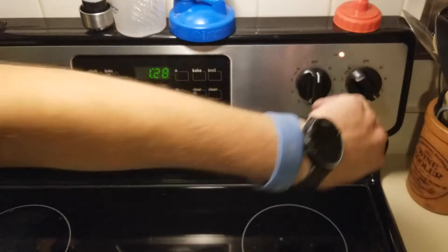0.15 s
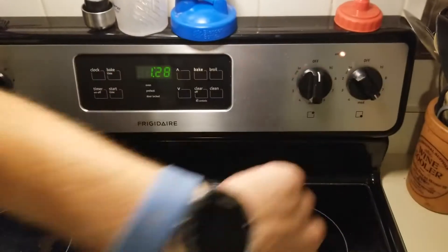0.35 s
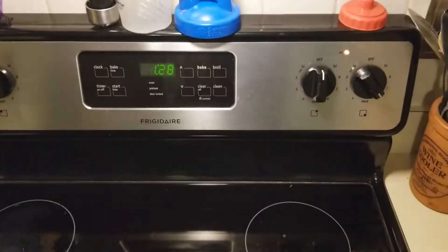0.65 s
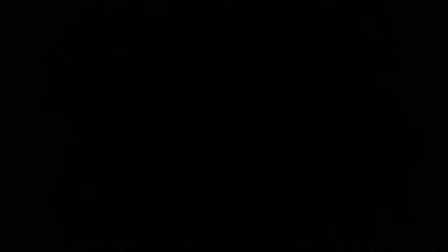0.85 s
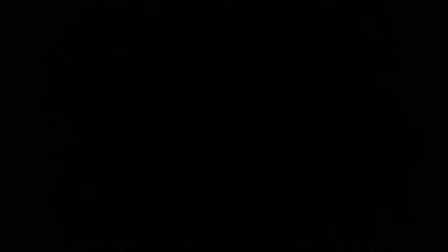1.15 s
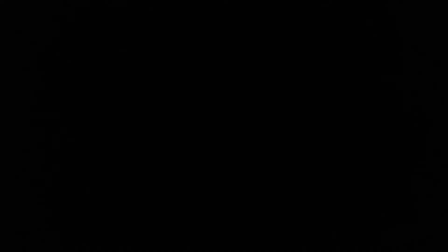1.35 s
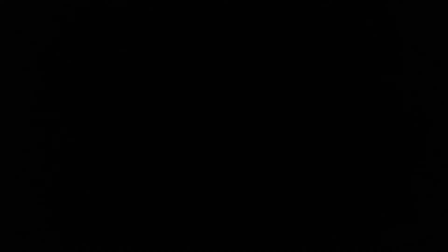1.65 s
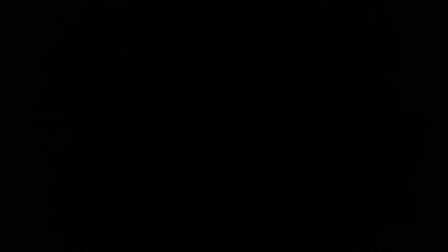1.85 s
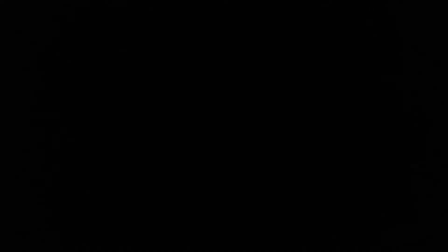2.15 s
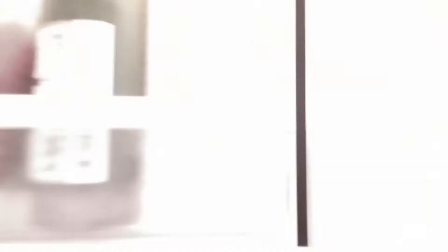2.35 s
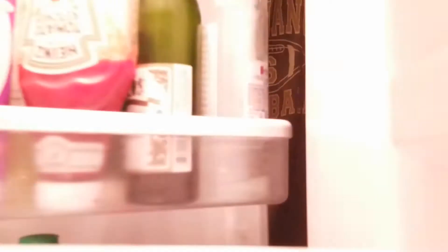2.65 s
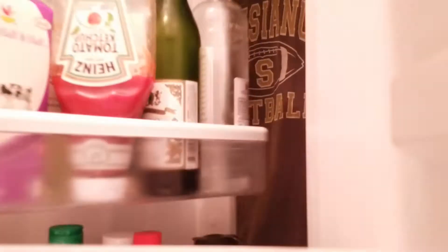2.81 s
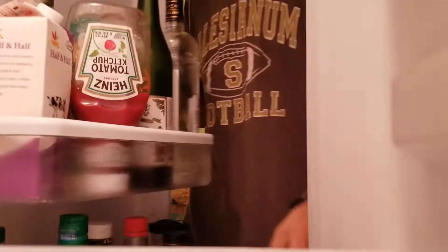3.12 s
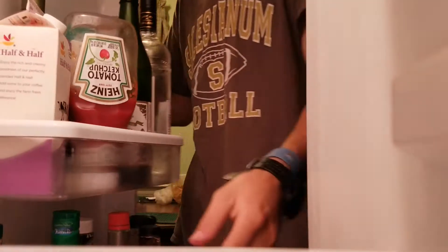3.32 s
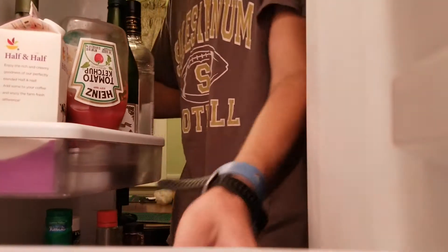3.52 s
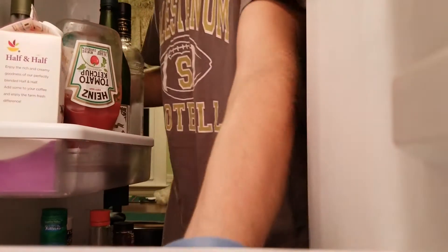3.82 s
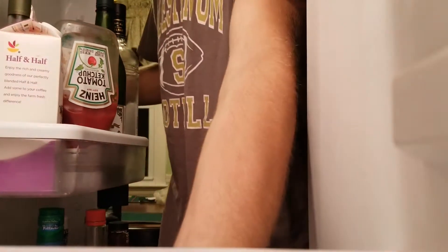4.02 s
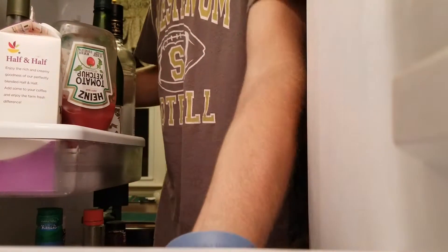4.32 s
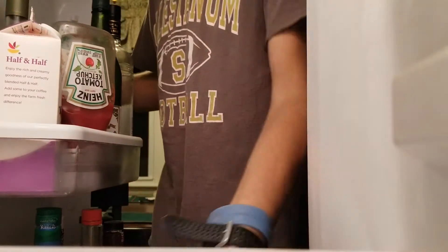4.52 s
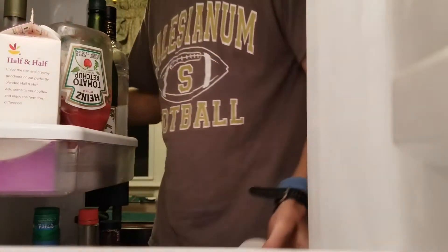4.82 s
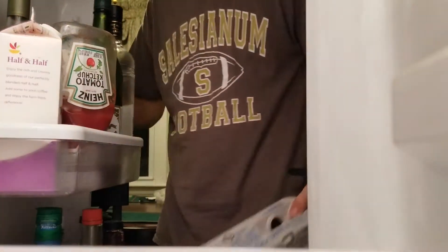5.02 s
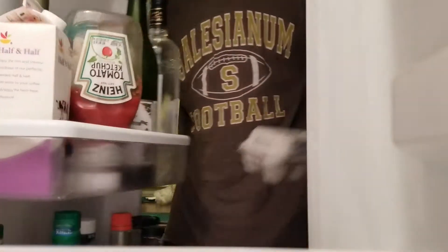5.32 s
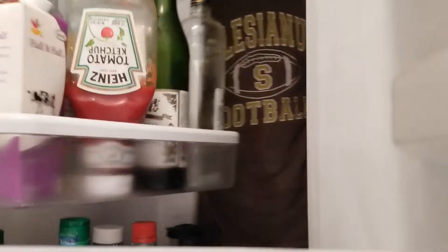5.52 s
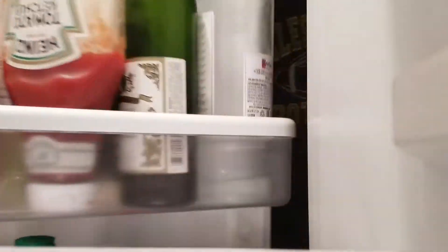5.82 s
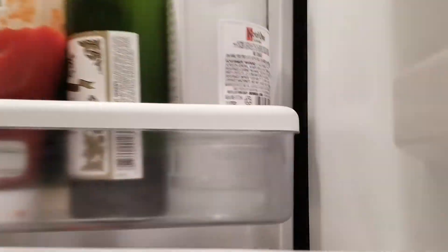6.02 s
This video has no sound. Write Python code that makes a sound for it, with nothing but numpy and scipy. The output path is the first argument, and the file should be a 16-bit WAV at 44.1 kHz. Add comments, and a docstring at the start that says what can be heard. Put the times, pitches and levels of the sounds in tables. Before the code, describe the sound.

A quiet kitchen cuts to a humming refrigerator interior; the door peels open with knocks and clinking bottles, a carton scrapes out, the door thuds shut.

```python
"""A quiet kitchen hums faintly while soft brushes pass, until a hard cut to the inside of a humming refrigerator.
There the compressor and fan (wavering tones, coloured noise) go on; blows ring the cabinet, door racks tick.
The door seal peels loose in crackles and squeaks, the door swings open and bottles clink (decaying modes).
An egg carton snags and is dragged out over the shelf (random slips ringing resonances).
The door swings back and thuds shut."""
import sys
import numpy as np
from scipy import signal
from scipy.fft import rfft, irfft, next_fast_len
from scipy.io import wavfile

SR = 44100
rng = np.random.default_rng(int(sys.argv[2]) if len(sys.argv) > 2 else 0)


def wrap_up_sound(samples):
    """Save the sound to the file named by the first command line argument, as 16-bit audio."""
    columns = np.atleast_2d(samples).T
    # keep every value between -1 and 1, then stretch to whole-number steps
    tamed = np.clip(columns, -1, 1)
    steps = np.round(tamed * 32767).astype(np.int16)
    wavfile.write(sys.argv[1], SR, steps)


N = 271563
T = np.arange(N) / SR


def amp(db):
    """Decibels to gain."""
    return 10 ** (np.asarray(db) / 20)


def unit(x):
    """Scale to rms 1."""
    return x / np.sqrt(np.mean(x ** 2))


def attack_level(x):
    """Scale each channel so that its first 20 ms have a spread (rms) of 1."""
    return x / np.std(x[:, :SR // 50], axis=1, keepdims=True)


def envelope(s, length, attack_s, release_s):
    """Rise from time s, hold until the length is up, then fall 60 dB in the release time."""
    rise = np.clip((T - s) / attack_s, 0, 1)
    return rise * amp(-60 * np.maximum(T - s - length, 0) / release_s)


def colour(x, points, power=1):
    """Filter by a spectrum of (Hz, dB) points, its dB values scaled by power."""
    hz, db = np.transpose(points)
    size = next_fast_len(N)
    f = np.maximum(np.arange(size // 2 + 1) * SR / size, 1)
    gain = amp(power * np.interp(np.log(f), np.log(hz), db))
    return irfft(rfft(x, size) * gain, size)[..., :N]


def band(x, lo_hz, hi_hz, order=2):
    """Causal band-pass."""
    edges = [lo_hz, min(hi_hz, .45 * SR)]
    return signal.sosfilt(signal.butter(order, edges, "band", fs=SR, output="sos"), x)


def resonate(x, modes):
    """Parallel resonances (Hz, width Hz, dB)."""
    return sum(amp(db) * signal.lfilter(*signal.iirpeak(hz, hz / width, SR), x) for hz, width, db in modes)


def walk(rate):
    """Random drift: straight lines between normal draws, rate draws per second."""
    points = rng.standard_normal(int(N / SR * rate) + 2)
    return np.interp(T * rate, np.arange(len(points)), points)


def noise():
    """Two unrelated noises: mid and side."""
    return rng.standard_normal((2, N))


def slips(rate, scatter_db):
    """Random tiny slips of scattered strength, rate per second; mid and side share their moments."""
    size = amp(scatter_db * np.minimum(rng.exponential(size=N), 5))
    return noise() * size * (rng.random(N) < rate / SR)


def add(out, s, x):
    """Mix x in from time s."""
    i = int(s * SR)
    out[..., i:i + x.shape[-1]] += x[..., :N - i]


def tone(hz, waver):
    """A motor tone near rms 1 whose phase and level wander; waver sets how far."""
    phase = 2 * np.pi * hz * T + waver * walk(7)
    return np.sqrt(2) * np.sin(phase) * amp(2 * waver * walk(11))


# mains and motor tones: pitch_hz, level_db
KITCHEN_TONES = [(59.2, -51.5), (118.4, -58.5), (204.6, -75), (242.2, -68), (296.1, -72), (1190, -88),
                 (4570, -79)]
# room air spectrum: freq_hz, density_db (per Hz, relative)
KITCHEN_AIR = [(82, -22), (140, 0.5), (151, -6), (238, 6.5), (367, 5.5), (578, -8), (1150, -17.5),
               (2630, -29), (3270, -24), (4140, -33), (4480, -19), (4850, -32), (6520, -28), (8090, -33),
               (15500, -28)]
KITCHEN_AIR_DB = -61


def kitchen():
    """Faint mains hum from wavering sines; room air and the rumble of the building from filtered noise."""
    hum = sum(amp(db) * tone(hz, waver=0.85) for hz, db in KITCHEN_TONES)
    rumble = amp(-69) * unit(band(noise(), 25, 105))
    air = amp(KITCHEN_AIR_DB) * unit(colour(noise(), KITCHEN_AIR))
    return hum, rumble + air


# soft brushes of hand, sleeve and carton: start_s, length_s, rub_db, swish_db
BRUSHES = [(0.135, 0.51, -83, -77), (3.045, 0.55, -81, -77), (4.998, 0.3, -65, -74.5),
           (5.143, 0.12, -51.5, -87), (5.265, .1, -58, -70.5), (5.561, 0.095, -54.5, -91),
           (5.741, 0.12, -49.5, -74)]
# hollow carton resonances, also for catches and strokes: pitch_hz, width_hz, level_db
CARTON = [(240, 42, 1), (475, 65, 5.5), (643, 24, 4), (762, 42, 4), (918, 90, -5), (1082, 34, 6.5),
          (1332, 16, -9), (1560, 57, -12), (1973, 19, -3.5)]
# resonances of the hollow rustle: pitch_hz, width_hz, level_db
RUSTLE_MODES = [(820, 81, 5), (1170, 670, -4.5), (1596, 130, 9)]
# the rustle sags, then stops
RUSTLE_S, RUSTLE_LENGTH_S, RUSTLE_DB, RUSTLE_SAG_DB_PER_S = 0.819, 0.21, -47, 59


def brushes():
    """Light rubbing (slips through the carton, swishing noise) that swells and fades; one hollow rustle."""
    rub = unit(resonate(band(slips(rate=860, scatter_db=-2.5), 270, 1800), CARTON))
    swish = unit(band(noise(), 3430, 7250, order=3))
    sag_db = RUSTLE_SAG_DB_PER_S * np.maximum(T - RUSTLE_S, 0)
    rustle = amp(RUSTLE_DB - sag_db) * envelope(RUSTLE_S, RUSTLE_LENGTH_S, attack_s=0.016, release_s=0.12)
    out = rustle * unit(resonate(band(noise(), 550, 1230), RUSTLE_MODES))
    for s, length, rub_db, swish_db in BRUSHES:
        swell = np.sin(np.pi * np.clip((T - s) / length, 0, 1))
        out = out + swell * (amp(rub_db) * rub + amp(swish_db) * swish)
    return out


# the door swings open, then shut: start and length of each swing
OPENS_S, OPENING_S, CLOSES_S, CLOSING_S = 2.255, 0.98, 5.106, 1


def door_motion():
    """Opening and speed (both 0-1): each swing starts gently, is fastest halfway and eases to its end."""
    out = np.clip((T - OPENS_S) / OPENING_S, 0, 1)
    back = np.clip((T - CLOSES_S) / CLOSING_S, 0, 1)
    opening = np.sin(np.pi / 2 * out) ** 2 * np.cos(np.pi / 2 * back) ** 2
    return opening, np.sin(np.pi * out) + np.sin(np.pi * back)


# compressor and fan tones: pitch_hz, shut_db, open_db (door shut, door open)
HUM = [(59.88, -34, -38.5), (119.7, -67, -48.5), (166, -52.5, -58), (205.6, -43.5, -42), (243.8, -53, -56),
       (284, -67, -54.5), (442, -67.5, -76), (592, -65, -64.5)]
WHINE_HZ, WHINE_DB = 4610, -80
# a narrow gap tunes the cabinet to the motor: extra boom around this opening (0-1), over this range
AJAR_DB, AJAR_AT, AJAR_RANGE = 5.5, 0.29, 0.21


def compressor():
    """The cabinet booms at the motor's rate, most with the door ajar; upper tones waver more."""
    opening, _ = door_motion()
    tones = []
    for hz, shut_db, open_db in HUM:
        level = amp(shut_db + opening * (open_db - shut_db))
        tones.append(level * tone(hz, min(hz / 620, 1)))
    boom, *upper = tones
    ajar = amp(AJAR_DB * np.exp(-((opening - AJAR_AT) / AJAR_RANGE) ** 2))
    hum = boom * ajar + sum(upper)
    # a thin whine pulses once per turn of the motor, over a narrow hiss
    pulsing = 1 + .5 * np.sin(2 * np.pi * HUM[0][0] * T)
    hiss = unit(band(rng.standard_normal(N), 4420, 4670))
    whine = pulsing * tone(WHINE_HZ, waver=0.53) + 0.78 * hiss
    return hum + amp(WHINE_DB - 1.8 * opening) * whine


# fan air spectrum in the cabinet: freq_hz, density_db (per Hz, relative)
FAN_AIR = [(15, -62), (25, -27), (35, -12), (48, -18), (68, -4), (86, -5), (113, -4), (148, -18.5),
           (204, -6), (305, -14), (378, -36), (469, -23.5), (1490, -42), (4620, -61.5), (15500, -61)]
# resonances of liner and shelves, also for the knocks: pitch_hz, width_hz, level_db
CABINET = [(444.6, 54, 9.5), (644, 34, 5), (762.6, 12, 4.5), (987, 47, -5), (1157, 27, 2), (1307, 66, -0.5),
           (1580, 41, -7.5), (1914, 103, 0), (2330, 290, -11), (2710, 68, -19), (2950, 89, -20),
           (3300, 110, -6), (4030, 42, -25), (4310, 48, -5), (5180, 57, -15), (6400, 130, -62)]


def fan():
    """Circulating air, partly ringing in the cabinet; the open door lets the room's low drone in."""
    opening, _ = door_motion()
    air = unit(colour(noise(), FAN_AIR)) * amp(.6 * walk(6))
    hollow = unit(resonate(band(noise(), 338, 1084), CABINET))
    drone = amp(-60) * opening * unit(band(noise(), 79, 320))
    return amp(-45 + 2.6 * opening) * air + amp(-54.5 - 5.1 * opening) * hollow + drone


# blows: start_s, part, level_db, contact_hz (the harder the higher), thump_db
KNOCKS = [(0.996, "wall", -36, 50, -19), (1.077, "rack", -30.5, 877, -21),
          (1.15, "shelf", -50.5, 4360, -44), (1.521, "shelf", -37, 596, -23),
          (1.547, "shelf", -39.5, 600, -15), (1.798, "wall", -48.5, 503, -20),
          (1.944, "wall", -39, 1600, -14), (1.956, "rack", -28.5, 1480, -14.5),
          (2.016, "door", -35.5, 1700, -24), (2.035, "door", -34.5, 5440, -9),
          (2.152, "shelf", -31.5, 1300, -35), (2.208, "rack", -35, 800, -19),
          (2.315, "frame", -35.5, 845, -38), (2.625, "shelf", -49, 400, -28),
          (2.706, "shelf", -53, 500, -40), (2.999, "door", -49.5, 650, -34.5),
          (4.307, "frame", -36, 340, -36), (4.519, "shelf", -33.5, 865, -14),
          (4.557, "shelf", -39, 300, -29), (4.582, "shelf", -30, 300, -24),
          (5.996, "frame", -31.5, 1820, -16.5), (6.031, "rack", -42, 2400, -20.5)]
# parts that get struck: thump_hz, body_hz, knock_hz, knock_db (lift of the 900-3000 Hz band),
# t60_s (of the lowest band)
PARTS = {"wall": (218.5, 289, 1104, -1.5, 0.11), "rack": (201, 455, 1970, 1.95, 0.086),
         "door": (68, 310, 1090, 3.1, 0.067), "shelf": (90, 502, 1150.5, -2.5, 0.11),
         "frame": (73, 770, 1230, 5.9, 0.077)}
# bands of the clatter: low_hz, high_hz
KNOCK_BANDS_HZ = [(260, 900), (900, 3000), (3000, 8000), (8000, 16000)]
# one level per band at the hardest contact: level_db
KNOCK_BANDS_DB = [0.5, 1, 4, 5.5]
ROLL_OFF_DB = 42  # treble lost above the contact frequency, dB per decade
THUMP_LOW_HZ = 34.8  # lower edge of the thumps' band


def knocks():
    """Each blow flexes a panel (thump), rings the struck part and sets liner and shelves clattering."""
    thumps, clatter = np.zeros(N), np.zeros((2, N))
    t = T[:SR // 2]
    centres = np.sqrt(np.prod(KNOCK_BANDS_HZ, axis=1))
    for s, part, db, contact_hz, thump_db in KNOCKS:
        thump_hz, body_hz, knock_hz, knock_db, t60 = PARTS[part]
        swing = np.sin(2 * np.pi * thump_hz * t) * (1 - np.exp(-t / 0.00081))
        add(thumps, s, amp(thump_db - 60 * t / 0.089) * swing)
        struck_part = [(body_hz, 55, 0), (knock_hz, 170, 0)]
        # a soft contact dulls the upper bands, relative to the lowest
        reach = np.hypot(contact_hz, centres)
        dull_db = ROLL_OFF_DB * np.log10(reach / reach[0])
        for k, (lo, hi) in enumerate(KNOCK_BANDS_HZ):
            # each higher band rings a little longer; a weak tail follows
            decay = amp(-60 * t / (t60 * 1.14 ** k)) + amp(-25.5 - 60 * t / 0.27)
            burst = rng.standard_normal((2, len(t))) * decay * (1 - np.exp(-t / 0.0014))
            paths = (0.49, burst), (0.98, resonate(burst, CABINET)), (0.73, resonate(burst, struck_part))
            x = sum(share * unit(band(path, lo, hi, order=5)) for share, path in paths)
            level_db = db + KNOCK_BANDS_DB[k] + knock_db * (k == 1) - dull_db[k]
            add(clatter, s, amp(level_db) * attack_level(x))
    return band(thumps, THUMP_LOW_HZ, 1900), clatter


# ticks of the plastic door racks under strain: start_s, peak_db, upper_edge_hz
TICKS = [(1.151, -34.5, 4600), (2.1206, -32, 14000), (2.2041, -31, 16000), (2.2454, -30.5, 16000),
         (2.4455, -34.5, 14000)]
# rack resonances: pitch_hz, width_hz, level_db
RACK = [(3300, 100, -14), (6070, 570, 5), (6200, 200, -16), (10400, 340, -19), (11000, 470, -16),
        (13500, 480, -13), (14180, 560, 4)]


def racks():
    """Sharp plastic ticks: noise bursts ringing the rack, smeared by the close walls."""
    out, t = np.zeros((2, N)), T[:SR // 4]
    for s, db, top_hz in TICKS:
        burst = rng.standard_normal((2, len(t))) * (amp(-60 * t / 0.07) + amp(-28.0 - 60 * t / 0.24))
        x = band(resonate(burst, RACK) + 0.34 * burst, 2130, top_hz)
        add(out, s, amp(db) * x / np.abs(x).max())
    return out


# seal pulls, peeling off the frame or pressed onto it: start_s, length_s, rumble_db, crackle_db
PULLS = [(1.968, 0.06, -23.5, -32.5), (2.023, .025, -18, -45), (2.106, 0.04, -21, -31),
         (2.177, 0.21, -29, -44), (2.446, 0.015, -43, -38.5), (5.983, 0.037, -27.5, -36.5)]
PULL_ATTACK_S, RUMBLE_RELEASE_S, CRACKLE_RELEASE_S = 0.014, 0.39, 0.22
# crackle spectrum of the seal: freq_hz, level_db
SEAL_COLOUR = [(150, -22), (250, 7), (544, -19.5), (692, -11.5), (1430, -15.5), (4630, -31), (6770, -35.5),
               (8620, -45.5), (12400, -38), (15500, -50)]
# the rubber lets go in short squeaks: start_s, length_s, pitch_hz, width_hz, level_db
SQUEAKS = [(2.082, .045, 2000, 597, -39.5), (2.11, .022, 1680, 160, -28), (2.126, 0.016, 1290, 400, -30.5),
           (2.124, 0.033, 670, 200, -29), (2.168, 0.018, 705, 80, -37), (2.21, 0.032, 1216, 160, -39.5)]
# swing levels, before they fall with slower speed and wider opening
SWING_RUMBLE_DB, SWING_CRACKLE_DB = -40.5, -57.5


def door():
    """Low noise rumbles, slips crackle and narrow noise squeaks; the swing is heard most while the door is near."""
    opening, speed = door_motion()
    swing = speed * (1 - opening)
    rumble, crackle = amp(SWING_RUMBLE_DB) * swing, amp(SWING_CRACKLE_DB) * swing
    for s, length, rumble_db, crackle_db in PULLS:
        rumble_pull = amp(rumble_db) * envelope(s, length, PULL_ATTACK_S, RUMBLE_RELEASE_S)
        crackle_pull = amp(crackle_db) * envelope(s, length, PULL_ATTACK_S, CRACKLE_RELEASE_S)
        # add as powers
        rumble, crackle = np.hypot(rumble, rumble_pull), np.hypot(crackle, crackle_pull)
    out = rumble * unit(band(noise(), 30, 126))
    out += crackle * unit(colour(slips(rate=11000, scatter_db=4.5), SEAL_COLOUR))
    for s, length, hz, width, db in SQUEAKS:
        lip = [(hz, width, 0)]
        ring = resonate(resonate(rng.standard_normal((2, SR // 4)), lip), lip)
        swell = signal.windows.tukey(int(length * SR), .5)
        add(out, s, amp(db) * swell * unit(ring[:, -len(swell):]))
    return out


# bottles touch: start_s, ring_peak_db
CLINKS = [(2.153, -35.5), (2.318, -34), (2.339, -43)]
# bottle modes: pitch_hz, strength_db (relative, scaled and varied at each touch)
BOTTLE = [(2030, -46), (3074, -51), (3305, -55), (5033, -61), (5475, -67), (7251, -71), (8430, -97),
          (8726, -90), (9469, -62), (10664, -60), (11526, -63), (12123, -53), (13006, -78), (13474, -77),
          (14567, -87), (15019, -101)]


def bottles():
    """Full bottles ring briefly as decaying sines; every touch excites the modes differently."""
    out, t = np.zeros((2, N)), T[:SR // 2]
    hz, mode_db = np.transpose(BOTTLE)
    for s, db in CLINKS:
        strength = amp(0.67 * mode_db + 2 * rng.standard_normal((2, len(hz))))
        weights = strength * rng.choice([-1, 1], (2, len(hz)))
        ring = weights @ np.sin(2 * np.pi * hz[:, None] * t) * amp(-60 * t / 0.16)
        contact = band(rng.standard_normal((2, len(t))) * amp(-60 * t / 0.017), 400, 4000)
        add(out, s, amp(db) * (ring / np.abs(ring).max() + 1.8 * contact))
    return out


# the carton catches and bumps: start_s, tap_db, snap_db
CATCHES = [(3.46, -53, -80), (3.659, -50, -62), (3.78, -41.5, -67), (3.864, -54, -52.5),
           (3.931, -39.5, -66), (4.037, -40, -64), (4.193, -44, -55.5), (4.753, -50, -76),
           (4.852, -51, -72), (5.175, -43.5, -75), (5.768, -48.5, -79)]


def catches():
    """The carton's edge snags and springs free: a noise burst gives a snap and a hollow tap."""
    out, t = np.zeros((2, N)), T[:SR // 4]
    for s, tap_db, snap_db in CATCHES:
        burst = rng.standard_normal((2, len(t))) * amp(-60 * t / 0.13)
        tap = resonate(band(burst, 370, 1800), CARTON)
        snap = band(burst, 2500, 15000)
        add(out, s, amp(tap_db) * attack_level(tap) + amp(snap_db) * attack_level(snap))
    return out


# strokes of the carton over the shelf: start_s, length_s, pressure_db, rasp_db, hiss_db
STROKES = [(3.65, 0.075, -46.5, -53, -62), (3.736, 0.092, -44.5, -53, -59.5),
           (3.876, 0.13, -47, -55.5, -67.5), (3.993, 0.12, -54, -55.5, -57),
           (4.183, 0.062, -38.5, -49.5, -59.5), (4.358, 0.17, -68, -65, -63),
           (4.507, 0.13, -43.5, -55, -72), (4.635, 0.12, -39.5, -50, -64.5)]
# scratch spectrum of the carton's skin: freq_hz, density_db (per Hz, relative)
SCRATCH = [(1060, -36), (1800, 6), (2030, -3.5), (2760, -2), (3620, -3.5), (5870, -12), (6910, -13),
           (8290, -20), (12100, -10.5), (15100, -18.5), (15800, -28)]
# lowest shelf resonance: pitch_hz, width_hz, level_db
SHELF = [(234.5, 19, 0)]
# the carton grips at once; the hiss builds as it gathers speed; both die away as it stops
GRIP_S, GATHER_S, STOP_S = .014, 0.044, 0.35
# the shelf groans as the carton starts to slide
GROAN_S, GROAN_DB, GROAN_RISE_S, GROAN_FADE_S = 3.672, -38, 0.022, 0.96
SMEAR_S = 0.046  # the close walls smear each slip (t60)


def carton():
    """Stick-slip rings the hollow carton, its rough skin rasps and hisses, and the shelf groans."""
    grains = slips(rate=1600, scatter_db=3.3) * amp(2.5 * walk(70))
    t = T[:SR // 20]
    smear = rng.standard_normal((2, len(t))) * amp(-60 * t / SMEAR_S)
    grains = signal.fftconvolve(grains, smear, axes=1)[:, :N]
    body = unit(resonate(band(grains, 120, 3700), CARTON))
    skin = colour(unit(grains) + .65 * noise(), SCRATCH)
    rasp = unit(band(skin, 1630, 8900, order=4))
    hiss = unit(band(skin, 7650, 19500, order=4))
    pressing = rasping = hissing = 0
    for s, length, press_db, rasp_db, hiss_db in STROKES:
        grip = envelope(s, length, GRIP_S, STOP_S)
        speed = envelope(s, length, GATHER_S, STOP_S)
        pressing = np.maximum(pressing, amp(press_db) * grip)
        rasping = np.maximum(rasping, amp(rasp_db) * grip)
        hissing = np.maximum(hissing, amp(hiss_db) * speed)
    groaning = amp(GROAN_DB) * envelope(GROAN_S, GROAN_RISE_S, GROAN_RISE_S, GROAN_FADE_S)
    groan = groaning * unit(resonate(band(noise(), 200, 490), SHELF))
    return groan + pressing * body + rasping * rasp + hissing * hiss


# stereo width, in both places: freq_hz, side_minus_mid_db
PORT_WIDTH = [(60, -39), (125, -31), (250, -10), (500, -7), (1000, -4), (2000, 0), (15000, 1)]


def ports(pair, centred, pan):
    """Two microphone ports: alike in the bass, unrelated and unevenly shaded in the treble; the right hears later."""
    mid, side = pair[0] + centred, colour(pair[1], PORT_WIDTH)
    right = np.pad(mid - side, (10, 0))[:N]  # 10 samples late
    return np.array([colour(mid + side, pan, 0.66), colour(right, pan, -0.52)])


CUT_S = .826
# stereo shading, shared out between the ports: freq_hz, left_minus_right_db (before scaling)
KITCHEN_PAN = [(150, 0.5), (400, 0), (650, -7), (1200, -13.5), (1900, -1), (2700, -2), (4500, -15.5),
               (6500, -9.5), (8500, 0)]
INSIDE_PAN = [(350, 0), (1000, 1.5), (2000, 4.5), (4000, 7), (7300, 10), (9000, 1), (13000, 6)]
# broad tone shaping of the noises inside the cabinet: freq_hz, gain_db
INSIDE_TONE = [(300, -1.5), (600, 1), (1000, 0), (2000, -3.5), (4000, 0)]


def scene():
    """The kitchen until the cut, the inside of the refrigerator after it."""
    mains, room_air = kitchen()
    thumps, clatter = knocks()
    handling = brushes()
    outside = ports(room_air + handling, mains, KITCHEN_PAN)
    scattered = fan() + clatter + racks() + bottles() + door() + carton() + catches() + handling
    inside = ports(colour(scattered, INSIDE_TONE), compressor() + thumps, INSIDE_PAN)
    cut = np.clip((T - CUT_S) / 0.0015, 0, 1)
    return (1 - cut) * outside + cut * inside


TOP_HZ = 16000


def record(dry):
    """A steep low-pass cuts the top."""
    return signal.sosfilt(signal.ellip(10, .2, 80, TOP_HZ, fs=SR, output="sos"), dry)


dry = scene()
out = record(dry)
wrap_up_sound(out)
```